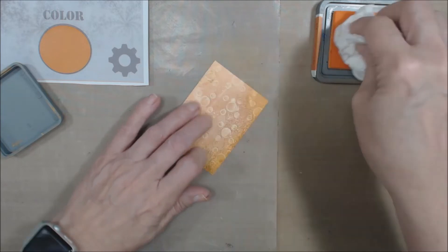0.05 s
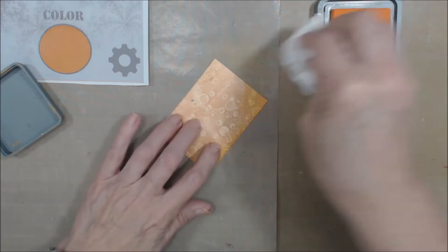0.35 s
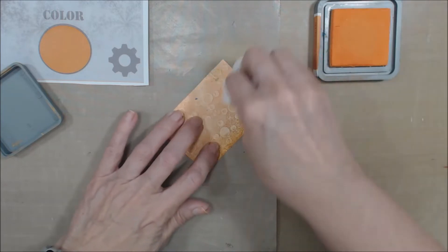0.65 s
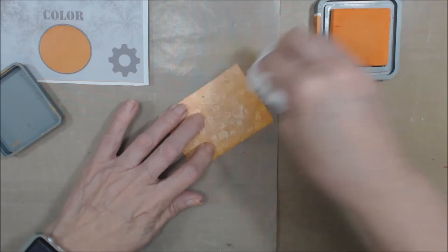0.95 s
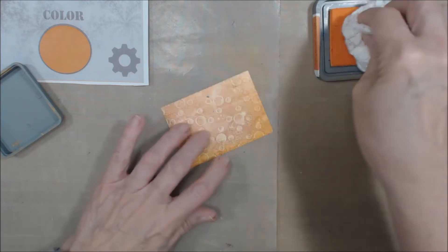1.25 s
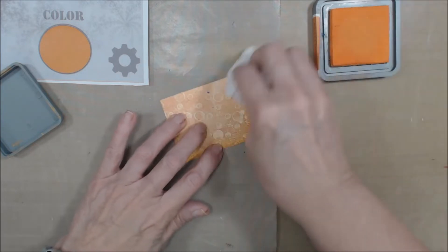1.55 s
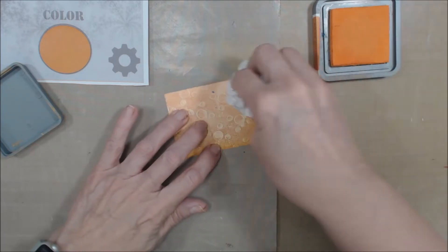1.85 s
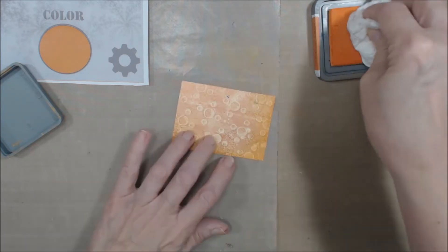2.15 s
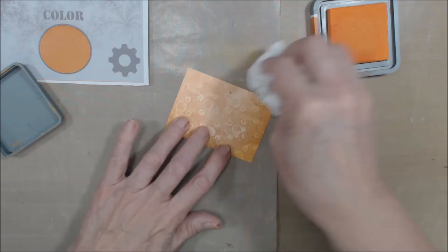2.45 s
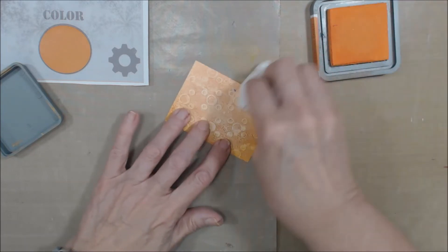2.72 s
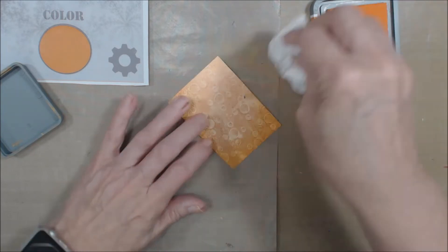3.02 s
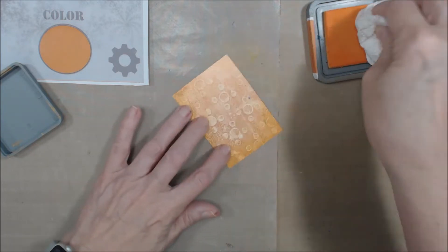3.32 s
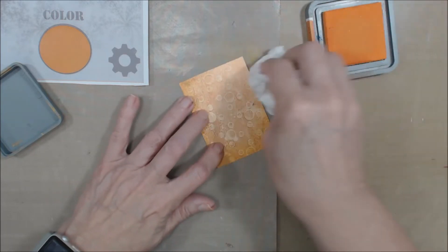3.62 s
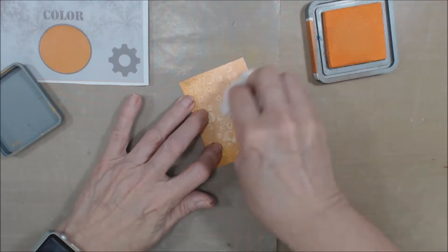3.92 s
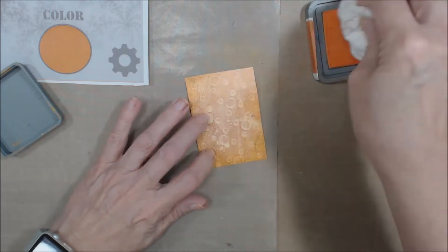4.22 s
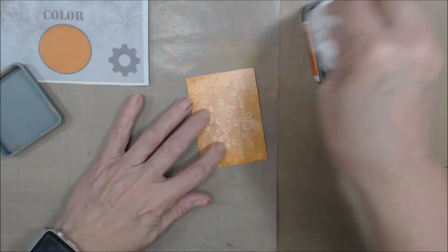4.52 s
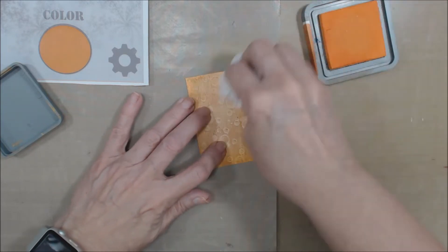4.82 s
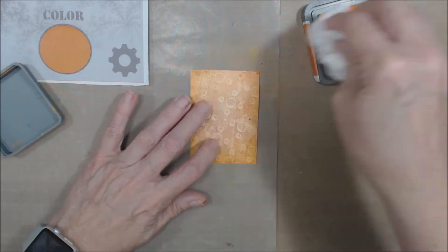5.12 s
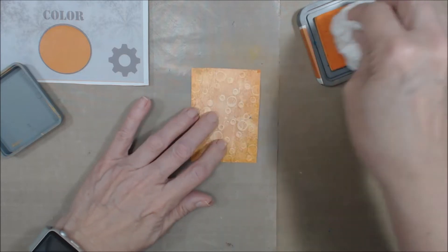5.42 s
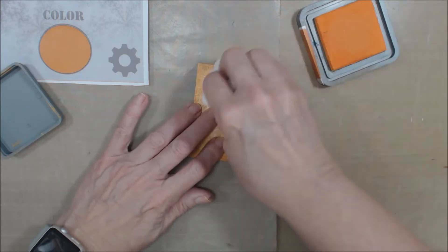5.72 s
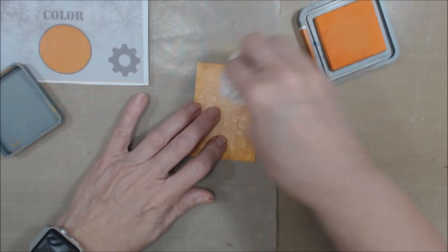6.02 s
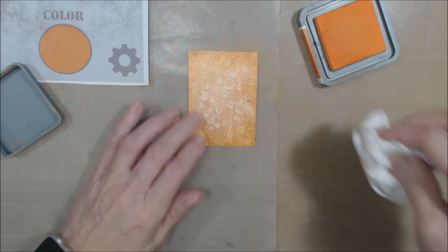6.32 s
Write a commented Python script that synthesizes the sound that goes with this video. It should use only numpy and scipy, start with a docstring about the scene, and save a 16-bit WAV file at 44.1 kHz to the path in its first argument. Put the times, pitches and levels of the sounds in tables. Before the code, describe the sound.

Six plastic ink pad knocks alternate with soft paper towel rubbing on a card, one knock a much louder clack.

```python
"""A crumpled paper towel is dabbed on an ink pad, then swirled over a card with a light touch and four
short strokes, six times over. Stick-slip friction of its fibres makes a hiss and a lower scrub, and its
creases buckle in tiny snaps. Each dab knocks the pad's plastic case on the desk, exciting the damped
modes of both; once the rim slaps down hard. The hand thuds softly through the desk, and a close
microphone hears a small, quiet room with a low hum."""
import sys
import numpy as np
from scipy import signal
from scipy.fft import rfft, irfft, next_fast_len
from scipy.io import wavfile
from scipy.ndimage import uniform_filter1d, map_coordinates

SR = 44100
rng = np.random.default_rng(int(sys.argv[2]) if len(sys.argv) > 2 else 0)


def dump_mix(stems):
    """Bounce the given channels to the path in sys.argv[1] as a 16-bit WAV at rate SR."""
    frames = np.atleast_2d(stems).T  # one column per channel
    limited = np.clip(frames, -1, 1)  # hard clip at full scale
    pcm = np.round(limited * 32767).astype(np.int16)
    wavfile.write(sys.argv[1], SR, pcm)


N = 288899

# spectral shapes of noise: frequency_hz, relative_db
AIR_SPECTRUM = [(8, -3.5), (18, 7), (32, -11), (60, -9.5), (85, -13.5), (150, -22.5), (200, -15),
                (310, -18), (450, -26.5), (780, -33), (950, -30.5), (2500, -52), (9000, -56),
                (16000, -59.5)]
THUD_SPECTRUM = [(30, -17.5), (120, 6), (260, -8), (500, -13), (1500, -56.5), (5000, -77.5)]  # hand on desk
GRIT_SPECTRUM = [(200, 5.5), (1000, 9.5), (2000, -6), (3000, -5.5), (5000, -10.5), (7000, -21),
                 (12000, -27), (16000, -35)]  # plastic contact
RATTLE_SPECTRUM = [(200, 15), (1000, -2), (4500, 12), (8500, 8), (11000, -4), (16000, -36)]  # slapped rim
HISS_SPECTRUM = [(500, -38), (1500, 3), (2650, -4), (3180, 1.5), (3650, -4.5), (4400, 2), (4900, 2.5),
                 (5350, 4), (6100, -1.5), (6900, -6.5), (8700, -2.5), (10100, -9.5), (11600, -3.5),
                 (16000, -12.5)]  # paper fibres
SCRUB_SPECTRUM = [(150, 3), (400, -2.5), (600, 2.5), (830, -7.5), (1250, 9), (1430, -2.5), (1800, 1),
                  (2020, 3.5), (2300, 2.5), (2700, -8), (4000, -4.5), (9000, -67)]  # pressed wad
# mains hum: pitch_hz, level_db
HUM_PARTIALS = [(59.2, -60.5), (119, -68.5)]
# narrow bands of room noise: centre_hz, half_width_hz, level_db
DRONE_BANDS = [(215.7, 21, -65.5), (325.6, 25, -64)]
# reflections off nearby surfaces: delay_s, gain_db
REFLECTIONS = [(.00099, -30), (.0026, -29.5), (.0043, -22.5), (.0068, -24.5)]

# the hand's loads, timed from a knock (pad) or a swirl (card): delay_s, heave_db, swing_hz, thud_db
PAD_PRESS = (0.01, -32, 16, -40)
PAD_RELEASE = (0.2, -40, 15, -49)
CARD_LANDING = (-0.004, -33, 27, -46)
CARD_RETURN = (0.14, -39, 15, -52)
CARD_PUSH = (0.26, -34, 24, -45.5)
# creases snapping, mostly as the towel peels off the pad: start_s, level_db
CREASE_SNAPS = [(0.148, -60), (0.444, -56.5), (.461, -56), (1.493, -61), (2.019, -56), (2.487, -60),
                (3.411, -58), (3.587, -64), (4.61, -64.5), (5.601, -61.5)]

# modes of the desk and of the pad's case, rim and foot: pitch_hz, relative_db, t60_s
DESK_MODES = [(111, -2, 0.078), (241.7, 1, 0.052), (350.5, 0.5, 0.051)]
CASE_MODES = [(421, -5, 0.017), (649, -4.5, 0.015), (904, -5, 0.009), (1093, 2.5, 0.016),
              (1277, 8.5, 0.0057), (1407, -10, 0.016), (1842, 0, 0.019), (1935, -8.5, 0.02),
              (2865, -5, 0.009), (4320, -21, 0.014)]
RIM_MODES = [(400, -21.5, 0.076), (423, -16.5, 0.048), (747.5, -17, .016), (870, -7.5, .015),
             (1066, -15.5, 0.033), (1360, -22.5, .03), (1750, -20.5, 0.021), (1960, -13, 0.014),
             (3870, -15.5, 0.016), (5050, -17, 0.02)]
FOOT_MODES = [(1100, 0, 0.012), (1285, 8, 0.012), (2080, -11.5, 0.012)]
# the case striking the desk: start_s, case_db, grit_db, desk_db, pitch_ratio, bounce_s, bounce_gain_db
CASE_KNOCKS = [(0.2439, -26.5, -36, -31.5, 0.944, 0.011, -8),
               (1.301, -24.5, -33.5, -29.5, 0.95, 0.0035, -3.5),
               (2.2937, -25.5, -36.5, -33, 0.92, 0.0041, -19), (3.386, -26, -34, -31, 0.957, .0048, -18.5),
               (4.429, -27, -24.5, -41, 1.048, 0.0042, -9), (5.4119, -28, -35, -34, 0.92, 0.0055, -17)]
# the rim slapping down: start_s, level_db
RIM_SLAPS = [(4.4335, -8)]
# the case settling as the towel lifts: start_s, level_db
CASE_SETTLES = [(2.441, -60), (3.532, -49.5), (3.568, -37.5)]

# the wad shifting in the fingers: start_s, length_s, attack_s, release_s, hiss_db, scrub_db
WAD_SHIFTS = [(0.0, 0.027, 0.0039, 0.015, -63, -62), (6.24, 0.073, 0.042, 0.016, -70.5, -76)]
# the twist on the pad after each knock: delay_s, length_s, attack_s, release_s, hiss_db, scrub_db
PAD_TWIST = (0.022, 0.103, 0.075, 0.02, -66.5, -65.5)
# swirls on the card: start_s, stretch_ratio, hiss_db, scrub_db, bearing_db_per_s, drag_db
CARD_SWIRLS = [(0.644, 1.086, -51.5, -55.5, 6.5, -65.5), (1.666, 1.01, -51.5, -52, -3, -77),
               (2.681, 0.99, -51, -51, 5.5, -88), (3.804, 0.99, -48.5, -51, -3, -81),
               (4.8, 0.992, -50.5, -50.5, 0.5, -77), (5.794, 0.97, -49.5, -50.5, -2, -73)]
# a swirl before stretching (touch down, out, back, out, lift away):
# delay_s, length_s, attack_s, release_s, hiss_gain_db, scrub_gain_db
SWIRL_STROKES = [(-0.031, 0.037, 0.014, 0.024, -9, -6.5), (0.012, 0.12, 0.035, 0.036, -0.7, 0.5),
                 (0.147, 0.1, 0.02, 0.075, -2, -4), (0.245, 0.1, 0.032, 0.046, 0, -1),
                 (0.329, 0.071, 0.034, 0.02, -10, -11.5)]
# the light drag through a swirl, before stretching: delay_s, length_s, attack_s, release_s
SWIRL_DRAG = (0.05, 0.33, 0.15, 0.02)


def amp(db):
    """Amplitude ratio of a level in decibels."""
    return 10 ** (np.asarray(db) / 20)


def unit(x):
    """Normalisation to an rms of 1."""
    return x / np.sqrt(np.mean(x ** 2) + 1e-20)


def ease(u):
    """A raised-cosine step from 0 to 1 as u goes from 0 to 1."""
    return np.sin(np.pi / 2 * np.clip(u, 0, 1)) ** 2


def filtered(x, response):
    """Linear filtering: the spectrum is multiplied by a frequency response."""
    size = next_fast_len(len(x) + 8192)
    return irfft(rfft(x, size) * response(np.fft.rfftfreq(size, 1 / SR)), size)[:len(x)]


def coloured(x, spectrum):
    """Spectral shaping, with levels interpolated over log frequency."""
    points_hz, db = np.transpose(spectrum)
    return filtered(x, lambda hz: amp(np.interp(np.log(hz + 1), np.log(points_hz), db)))


def noise(spectrum, samples=N):
    """Coloured Gaussian noise of rms 1."""
    return unit(coloured(rng.standard_normal(samples), spectrum))


def wobble(rate_hz):
    """Smooth random modulation: a spline through rate_hz knots a second."""
    knots = rng.standard_normal(int(N * rate_hz / SR) + 4)
    return map_coordinates(knots, [np.arange(N) * rate_hz / SR])


def add(track, start_s, sound):
    """Superposition of a sound on the track."""
    part = track[max(round(start_s * SR), 0):][:len(sound)]
    part += sound[:len(part)]


def ring(modes, t, pitch_ratio=1):
    """Free vibration: a sum of damped modes, each varying by about 1 dB from blow to blow."""
    return sum(amp(db + rng.standard_normal() - 60 * t / t60) * np.sin(2 * np.pi * hz * pitch_ratio * t)
               for hz, db, t60 in modes)


def room_tone():
    """Ambient noise floor: broadband air noise, mains hum and a narrow-band drone."""
    t = np.arange(N) / SR
    air = amp(-50.5 + 0.84 * wobble(4.9)) * noise(AIR_SPECTRUM)
    hum = sum(amp(db) * np.sqrt(2) * np.sin(2 * np.pi * hz * t + .5 * wobble(3))
              for hz, db in HUM_PARTIALS)
    drone = np.zeros(N)
    for centre, half_width, db in DRONE_BANDS:
        band = filtered(rng.standard_normal(N), lambda hz: 1 / (1 + ((hz - centre) / half_width) ** 2))
        drone += amp(db) * unit(band)
    return air + hum + drone


def reverberation(x, t60_s):
    """The diffuse field of a small room: convolution with dull, exponentially decaying noise."""
    t = np.arange(SR // 2) / SR
    diffuse = coloured(rng.standard_normal(len(t)), [(200, 1.5), (1500, -8.5), (5000, -13.5), (15000, -13.5)])
    tail = diffuse * amp(-60 * t / t60_s) * (t > .003)
    return signal.fftconvolve(x, tail / np.linalg.norm(tail))[:N]


def early_reflections(x):
    """Comb filtering: weak delayed copies interfere with the direct sound."""
    return filtered(x, lambda hz: 1 + sum(amp(db) * np.exp(-2j * np.pi * hz * delay)
                                          for delay, db in REFLECTIONS))


def hand_thuds():
    """Transient loading: each press heaves the desk through a slow swing or two, with a dull thud."""
    heave, thud = np.zeros((2, N))
    t = np.arange(SR // 2) / SR
    on_pad = CASE_KNOCKS, [PAD_PRESS, PAD_RELEASE]
    on_card = CARD_SWIRLS, [CARD_LANDING, CARD_RETURN, CARD_PUSH]
    for events, presses in on_pad, on_card:
        for start, *_ in events:
            for delay, heave_db, swing_hz, thud_db in presses:
                u = t * swing_hz / 0.46  # the swell peaks after about half a swing
                swell = u * np.exp(1 - u)
                scattered_hz = swing_hz * np.exp(.15 * rng.standard_normal())
                add(heave, start + delay, amp(heave_db) * swell * np.sin(2 * np.pi * scattered_hz * t))
                add(thud, start + delay, amp(thud_db - 60 * t / 0.14) * (1 - np.exp(-t / 0.0091)))
    return heave + thud * noise(THUD_SPECTRUM)


def slips(speed, per_second):
    """Stick-slip as a Poisson process: fibres catch and let go more often at higher speed."""
    rate = .2 + speed
    released = rng.random(N) < per_second * rate / SR
    return unit(released * rng.standard_normal(N) / np.sqrt(rate))


def crinkles(snaps_per_twist=3, strays_per_s=3.6):
    """Buckling: creases give way in brief noise bursts, over a faint rustle of the wad in the fingers."""
    envelope, t = np.zeros(N), np.arange(SR // 20) / SR
    delay, length, *_ = PAD_TWIST
    twisted = [(start + delay + length * u, -65.5)
               for start, *_ in CASE_KNOCKS for u in rng.random(snaps_per_twist)]
    strays = [(N / SR * u, -71) for u in rng.random(round(strays_per_s * N / SR))]
    faint = [(start, db + 3.5 * rng.standard_normal()) for start, db in twisted + strays]
    for start, db in CREASE_SNAPS + faint:
        add(envelope, start, amp(db - 60 * t / 0.021))
    rustle = amp(-88 + 2.9 * wobble(7)) * unit(coloured(slips(1, per_second=670), HISS_SPECTRUM))
    return envelope * noise(HISS_SPECTRUM) + rustle


def ink_pad():
    """Impact excitation: the case tips onto the desk and bounces once; at times it slaps or settles."""
    track, t = np.zeros(N), np.arange(SR // 8) / SR
    burst = lambda db, t60_s, spectrum: amp(db - 60 * t / t60_s) * noise(spectrum, len(t))
    rise = lambda seconds: 1 - np.exp(-t / seconds)
    for start, case_db, grit_db, desk_db, pitch_ratio, bounce_s, bounce_db in CASE_KNOCKS:
        for delay, gain_db in (0, 0), (bounce_s, bounce_db):
            grit = burst(grit_db, 0.047, GRIT_SPECTRUM)
            case = amp(case_db) * ring(CASE_MODES, t, pitch_ratio)
            add(track, start + delay, amp(gain_db) * rise(0.00071) * (grit - case))
        add(track, start, amp(desk_db) * ring(DESK_MODES, t) * rise(0.0056))
        # the towel crushes against the pad, swelling up to the knock
        crush = burst(-61, 0.055, HISS_SPECTRUM) + burst(-37.5, 0.0066, GRIT_SPECTRUM)
        add(track, start - len(t) / SR, crush[::-1])
    for start, db in RIM_SLAPS:
        u = t / .00008
        clap = u * np.exp(1 - u)  # one sharp push of air from under the rim
        rattle = burst(-11, 0.016, RATTLE_SPECTRUM)
        add(track, start, amp(db) * (clap + rise(0.0019) * (rattle + ring(RIM_MODES, t))))
    for start, db in CASE_SETTLES:
        add(track, start, amp(db) * ring(FOOT_MODES, t) * rise(0.00055))
    return track


def wad_resonances(x, spectrum, patchy_db):
    """Time-varying filtering: the paper's resonances shift as the wad changes shape."""
    frames = signal.stft(coloured(x, spectrum), nperseg=512)[2]
    patches = uniform_filter1d(rng.standard_normal(frames.shape), size=4, axis=0)  # across frequency
    patches = uniform_filter1d(patches, size=14, axis=1)  # across time
    return unit(signal.istft(frames * amp(patchy_db * unit(patches)), nperseg=512)[1][:N])


def towel_strokes():
    """Sliding motion: every shift, twist and swirl stroke, in the columns of WAD_SHIFTS."""
    twist_delay, *twist = PAD_TWIST
    drag_delay, drag_length, *drag_fades = SWIRL_DRAG
    strokes = WAD_SHIFTS + [(start + twist_delay, *twist) for start, *_ in CASE_KNOCKS]
    for start, stretch, hiss_db, scrub_db, bearing, drag_db in CARD_SWIRLS:
        strokes.append((start + stretch * drag_delay, stretch * drag_length, *drag_fades, drag_db, drag_db))
        for delay, length, attack, release, hiss_gain_db, scrub_gain_db in SWIRL_STROKES:
            weight_db = bearing * delay  # the hand bears down or eases off
            strokes.append((start + stretch * delay, stretch * length, attack, release,
                            hiss_db + hiss_gain_db + weight_db, scrub_db + scrub_gain_db + weight_db))
    return strokes


def towel_rubbing():
    """Friction noise: as each stroke speeds up and slows, fibres hiss and the wad scrubs lower down."""
    t = np.arange(SR // 2) / SR
    speed, hiss_power, scrub_power = np.zeros((3, N))
    for start, length, attack, release, hiss_db, scrub_db in towel_strokes():
        slide = (ease(t / attack) * ease((length - t) / release)) ** 2
        add(speed, start, slide / 2)
        add(hiss_power, start, slide * amp(hiss_db) ** 2)
        add(scrub_power, start, slide * amp(scrub_db) ** 2)
    grip = amp(0.34 * wobble(110))  # folds of the wad grip unevenly
    hiss = np.sqrt(hiss_power) * wad_resonances(slips(speed, 12000), HISS_SPECTRUM, patchy_db=2.0)
    scrub = np.sqrt(scrub_power) * wad_resonances(slips(speed, 2600), SCRUB_SPECTRUM, patchy_db=3.5)
    # between strokes the towel stays lightly in touch
    contact = np.sqrt(np.abs(uniform_filter1d(hiss_power, size=4000)))
    touch = contact * unit(coloured(slips(speed, 13000), HISS_SPECTRUM))
    return grip * (hiss + amp(-3.5) * scrub + amp(-14) * touch)


def scene():
    """Superposition at a close microphone, where direct sound outweighs the reverberation."""
    near = early_reflections(towel_rubbing() + ink_pad() + crinkles())
    return (near + amp(-19.5) * reverberation(near, t60_s=0.13) + hand_thuds() + room_tone())[None]


def record(dry):
    """Band limiting: the microphone passes nothing above 15.9 kHz."""
    return filtered(dry[0], lambda hz: hz < 15900)[None]


dry = scene()
out = record(dry)
dump_mix(out)
```